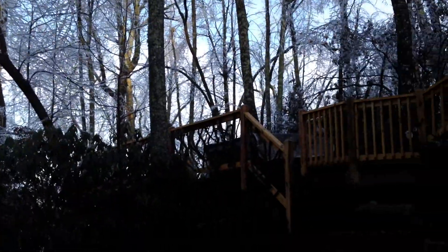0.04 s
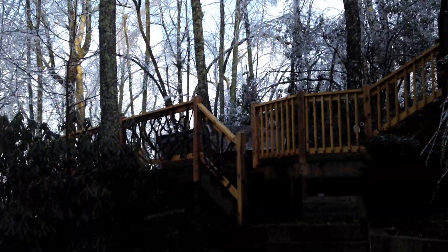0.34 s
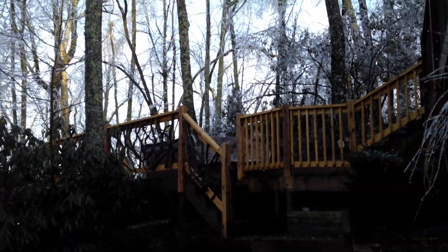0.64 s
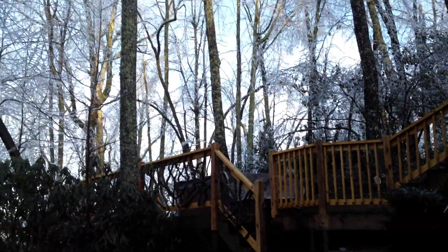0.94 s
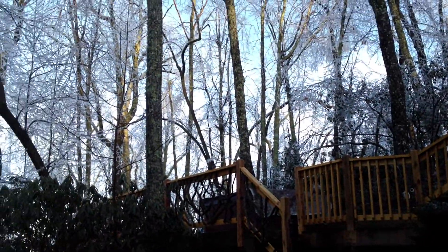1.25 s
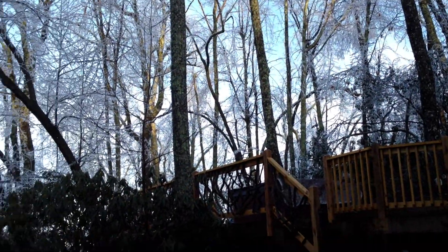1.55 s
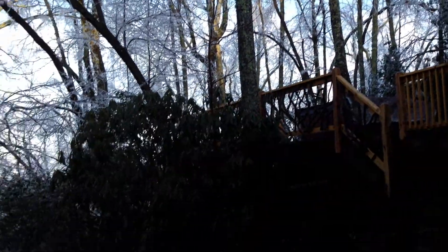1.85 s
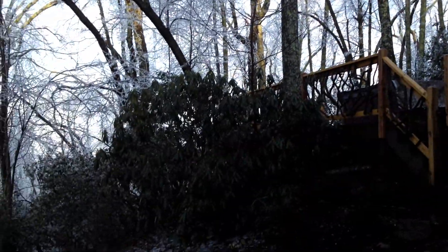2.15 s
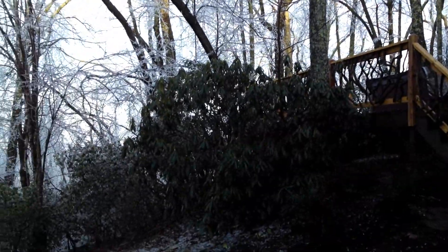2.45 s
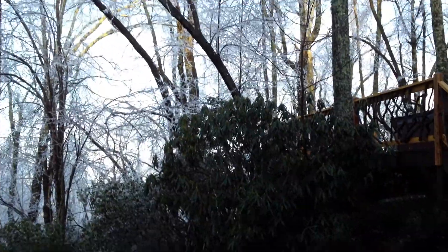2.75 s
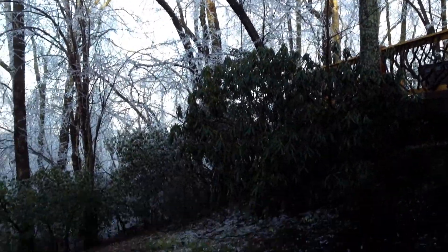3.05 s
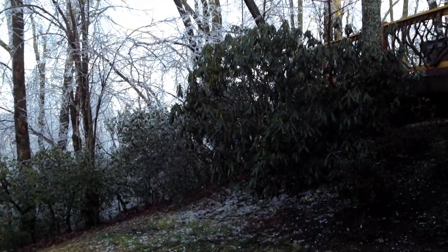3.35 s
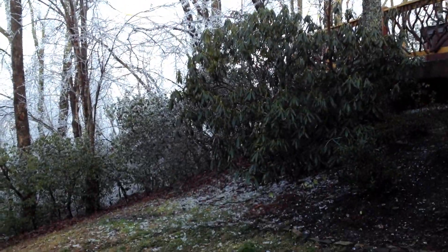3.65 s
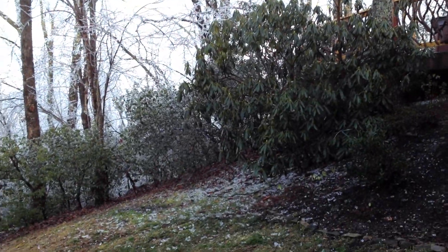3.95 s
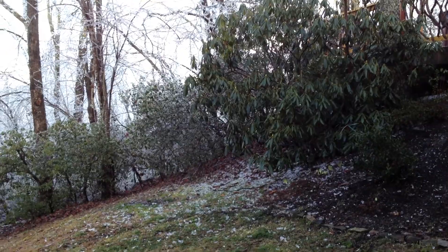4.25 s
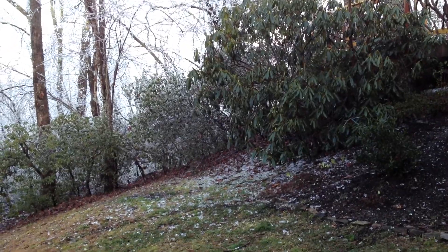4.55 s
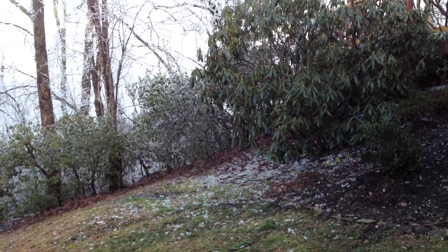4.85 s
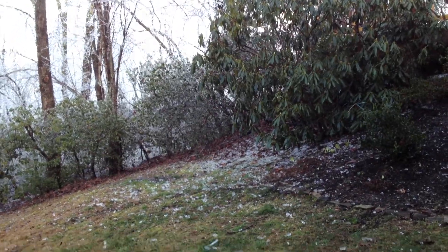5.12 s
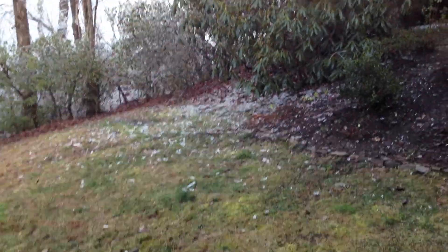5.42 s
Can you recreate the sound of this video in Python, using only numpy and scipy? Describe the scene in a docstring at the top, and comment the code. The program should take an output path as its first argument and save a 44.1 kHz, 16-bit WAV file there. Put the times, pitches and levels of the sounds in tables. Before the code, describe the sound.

A fine, rain-like hiss runs throughout as thawing ice and drips fall from trees onto leaves and ground in a wooded garden. Nearer clumps keep slapping down and scattering into fragments, while splinters snap with crisp clicks and hard pellets plink and clack on icy leaves.

A few plinks and a sharp tick open the sound. The hiss dips briefly near 0.4 seconds, then a lump lands on wood with a soft, hollow, crunchy knock at about 0.6 seconds. The sharpest click comes at 1.3 seconds, and the fall stays busy until nearly 3 seconds, with a cluster of ticks and faint dull branch taps around 1.8 seconds. More scattered ticks and clacks follow between 3.2 and 4.1 seconds as the patter gradually softens. A tick at 4.5 seconds and a clear little plink near 5 seconds stand out. Close hits carry a short echo from the trunks.

```python
"""A fine, hissing patter: ice thaws off the trees of a wooded garden, countless bits and drips landing
on leaves and ground. Nearer clumps slap down and scatter in bursts of fragments. Splinters snap with a
click and a spray of chips; hard pellets plink, clack on iced leaves or tap on branches, and one lump
knocks on wood, each ringing in a few damped modes. Trunks scatter a short echo. The sound is mono."""
import sys
import numpy as np
from scipy import signal
from scipy.fft import rfft, irfft, next_fast_len
from scipy.io import wavfile
from scipy.ndimage import uniform_filter1d, map_coordinates

SR = 44100
rng = np.random.default_rng(int(sys.argv[2]) if len(sys.argv) > 2 else 0)


def to_wav(sig):
    """Store sig (one row per channel, or 1-D mono) as 16-bit WAV at the path in sys.argv[1].

    Samples outside -1..1 are clipped; the rate is SR.
    """
    pcm = np.clip(np.atleast_2d(sig), -1, 1) * 32767
    pcm = np.round(pcm).astype(np.int16)
    wavfile.write(sys.argv[1], SR, pcm.T)  # frames by channels


N = 246078
TOP_HZ = 15500  # upper edge of the whole sound
CLICK_CYCLES = 1.15  # a splinter's click falls to 1/e in this many cycles

# How hard the ice is falling. Each row: time in seconds, strength in dB.
FALL_STRENGTH = [(0.0, -44), (0.39, -51), (0.53, -46), (1.93, -45), (3.54, -46.5), (4.38, -49.5),
                 (4.99, -52), (5.58, -51.5)]
def strength(s):
    """The swell and ebb of the fall, in dB at times s."""
    return np.interp(s, *np.transpose(FALL_STRENGTH))


# Ground, leaf and splinter bands; a heavier fall is brighter.
# Each row: base level in dB at the mean strength, dB gained per dB of strength.
BAND_RESPONSE = [(-57.5, 0.29), (-52.5, 0.56), (-48.5, 1.34)]
def shower():
    """The steady fall all through the wood: far hiss, with nearer grains blurred by their echo."""
    fall_db = strength(np.arange(N) / SR)
    band_db = np.array([db + growth * (fall_db - fall_db.mean()) for db, growth in BAND_RESPONSE])
    far = surfaces(hiss(patchy_db=1.67))
    grains = patter(count=4500, spread_db=4, cycles=3)
    near = surfaces(grains + amp(1) * trunks(grains))
    flurry_db = .3 * wobble(rate=30)
    bands = amp(-2) * far + amp([[-10], [-5.5], [-6.5]]) * near
    return np.sum(amp(band_db + flurry_db) * bands, axis=0)


def patter(count, spread_db, cycles):
    """Tiny impacts at random times, each a few cycles at its own pitch; on average a flat spectrum."""
    when, pitch, weight = rng.random((count, 3)).T[:, :, None]
    hz = 300 + 15000 * pitch ** 2
    n = np.arange(256)
    size = amp(spread_db * np.minimum(-np.log(1 - weight), 3.5)) * np.sqrt(hz * pitch)
    decay = np.exp(-hz * n / SR / cycles) * (1 - n / len(n))
    grains = size * np.sin(2 * np.pi * hz * n / SR) * decay
    positions = (when * N).astype(int) + n
    return unit(np.bincount(positions.ravel(), grains.ravel(), N)[:N])


def hiss(patchy_db):
    """Impacts too far to tell apart: noise with drifting patches of loudness."""
    spectrum = signal.stft(rng.standard_normal(N), nperseg=512)[2]
    patches = uniform_filter1d(rng.standard_normal(spectrum.shape), size=14, axis=0)  # across pitch
    patches = uniform_filter1d(patches, size=7, axis=1)  # across time
    return unit(signal.istft(spectrum * amp(patchy_db * unit(patches)), nperseg=512)[1][:N])


# The overall tone of the patter as heard, with a dip near 4.5 kHz. Each row: frequency in Hz, gain in dB.
PATTER_EQ = [(40, -13), (120, -10), (175, -3), (300, -2.5), (520, -3.5), (760, -2), (1150, -6),
             (1800, -2.5), (3400, -1), (4500, -9.5), (6000, -2.5), (8200, 0), (10000, -2.5), (15000, -3)]
def surfaces(x, leaf_hz=1200, splinter_hz=4500):
    """Give x the patter's tone and split it into ground, leaf and splinter bands, each of rms 1."""
    def above(hz, edge):
        return 1 - 1 / (1 + (hz / edge) ** 8)

    def band(share):
        return unit(filtered(x, lambda hz: amp(along(PATTER_EQ, hz)) * np.sqrt(np.abs(share(hz)))))

    ground = band(lambda hz: 1 - above(hz, leaf_hz))
    leaves = band(lambda hz: above(hz, leaf_hz) - above(hz, splinter_hz))
    splinters = band(lambda hz: above(hz, splinter_hz))
    return np.array([ground, leaves, splinters])


# Larger clumps landing; slush is dull, brittle ice bright.
# Each row: start in seconds, leaf slap level in dB, brightness in dB, t60 in seconds.
BIG_CLUMPS = [(0.06, -46, -14, 0.11), (.105, -53, -17, 0.41), (.211, -46.5, -0.5, 0.39),
              (.34, -49.5, 6, 0.49), (.452, -50.5, 5, 0.36), (.602, -48, 3, 0.33), (0.666, -42.5, 1, 0.11),
              (0.83, -51, 1, 0.49), (.962, -45.5, -7, 0.12), (1.071, -45.5, 2, 0.21),
              (1.118, -47.5, -12, 0.69), (1.322, -40, 2, 0.21), (1.369, -40.5, -2, 0.24),
              (1.468, -47.5, -9, 0.73), (1.516, -44.5, 2, 0.098), (1.607, -46, 0, 0.75),
              (1.76, -44.5, -10.5, 0.43), (1.815, -44, -11.5, 0.4), (1.848, -47, 2, 0.18),
              (1.946, -45, -7, 0.21), (1.995, -48.5, 2, 0.98), (2.105, -45.5, -3, 0.38),
              (2.217, -46, 4, 0.35), (2.292, -44, 0, 0.51), (2.439, -44.5, 3, 0.14),
              (2.563, -50.5, 3, 0.57), (2.638, -46, 1.5, 0.61), (2.73, -52.5, 8, .3),
              (2.845, -51.5, 5.5, 0.66), (3.147, -52, -17, 0.19), (3.234, -48, -4, 0.49),
              (3.315, -46, 0, 0.1), (3.62, -50, -1, 0.73), (3.812, -55, 7, .1), (3.868, -48, 4.5, 0.14),
              (4.101, -46.5, -6, 0.13), (4.22, -61, 12.5, 0.46), (4.514, -52, 7, 0.32),
              (4.98, -52, -1, 0.3), (5.279, -50.5, 0.5, 0.19)]
def clumps():
    """Each clump bursts into fragments that thin out fast; brittle ones splinter more and thud less."""
    t = np.arange(SR // 2) / SR
    power = np.zeros((3, N))
    for s, slap_db, bright_db, t60 in BIG_CLUMPS + small_clumps(count=30):
        thud_db = slap_db - 11.5 - 0.74 * bright_db
        # a loose clump that scatters for long also takes longer to land
        burst = amp(-60 * t / t60) * (1 - np.exp(-t / (0.0056 * t60)))
        for band, db in zip(power, (thud_db, slap_db, slap_db + bright_db)):
            add(band, s, (amp(db) * burst) ** 2)
    fragments = surfaces(patter(count=12000, spread_db=.5, cycles=3.5))
    rustle = surfaces(hiss(patchy_db=1.0))
    texture = amp([[-7], [-3], [-3]]) * fragments + amp([[-1], [-4], [-4]]) * rustle
    spill = np.sum(np.sqrt(power) * texture, axis=0)
    # light pieces stir little bass, and wet leaves soften the highest treble
    return filtered(spill, lambda hz: hz / np.hypot(hz, 190) / np.hypot(1, (hz / 15000) ** 2))


def small_clumps(count, usual_t60=0.17):
    """Rows of lighter clumps, strewn loosely through time, their level riding the fall's strength."""
    place, size, tint, length = rng.standard_normal((count, 4)).T
    s = (np.arange(count) + place % 1) / count * N / SR
    slap_db = strength(s) - 9.5 + 0.5 * size
    bright_db = 5 * np.maximum(tint, -.5)
    return list(zip(s, slap_db, bright_db, usual_t60 * np.exp(length / 2)))


# Single splinters up close. Each row: start in seconds, click level in dB, pitch in Hz,
# spray level in dB, spray t60 in seconds.
SPLINTER_TICKS = [(.1422, -21.5, 6500, -35, .022), (0.2139, -35, 5000, -40.5, .09),
                  (0.2361, -32, 5000, -37, .03), (.5565, -28, 6800, -39, .015),
                  (.673, -33, 6000, -39.5, 0.091), (0.8313, -29, 4660, -36, 0.038),
                  (1.0715, -28, 8700, -42, .03), (1.2337, -23, 7740, -42, .015),
                  (1.322, -12.5, 8600, -33.5, 0.048), (1.333, -27, 6500, -43, .03),
                  (1.3793, -22, 11500, -37, .035), (1.8132, -21, 7350, -31.5, 0.012),
                  (1.851, -24, 7950, -37.5, .05), (1.855, -27, 8500, -47, .02),
                  (1.9464, -25, 4000, -40, 0.043), (1.996, -28, 6000, -40, .025),
                  (2.04, -28, 6800, -42, .02), (2.219, -30, 11700, -43, .05),
                  (2.329, -27, 7650, -37, 0.036), (2.44, -35, 5000, -43, .04),
                  (2.564, -37, 5200, -44, .016), (2.669, -34, 6900, -42, .03), (2.737, -34, 8000, -46, .03),
                  (3.2335, -32, 11000, -38.5, .02), (3.328, -30, 7500, -39, .03),
                  (3.458, -30, 10500, -41, .05), (4.5131, -30, 8140, -39.5, 0.029),
                  (4.964, -36, 7600, -43, .018)]
def ticks(spray_db_per_octave=11.5):
    """A splinter snaps: one sharp click, then a spray of chips through the leaves around its pitch."""
    out, t = np.zeros(N), np.arange(SR // 8) / SR
    freqs = np.fft.rfftfreq(len(t), 1 / SR)
    for s, click_db, hz, spray_db, t60 in SPLINTER_TICKS:
        click = np.sin(2 * np.pi * hz * t) * np.exp(-hz * t / CLICK_CYCLES)
        octaves_away = np.abs(np.log2((freqs + 1) / hz))
        colour = amp(along(PATTER_EQ, freqs) / 2 - spray_db_per_octave * octaves_away)
        noise = rng.standard_normal(len(t))
        spray = unit(irfft(rfft(noise) * colour * (freqs < TOP_HZ), len(t)))
        add(out, s, amp(click_db) * click + amp(spray_db) * spray * amp(-60 * t / t60))
    return out


# Hard pellets that ring. Each row: start in seconds, relative level in dB, pitch in Hz, t60 in seconds.
PELLET_PLINKS = [(.044, -21, 2560, .018), (0.073, -23, 2470, .015), (.105, -27, 11000, .04),
                 (0.142, -26, 3290, 0.032), (.965, -31.5, 1400, .05), (1.386, -22, 3100, .022),
                 (1.8318, -22, 3040, 0.025), (2.329, -26, 2490, .025), (2.641, -28, 2420, .025),
                 (3.3543, -26, 3640, .022), (3.6665, -26, 2090, .016), (3.809, -29, 2920, .02),
                 (3.877, -34, 2800, .025), (4.108, -39, 3140, .02), (4.9646, -19, 2670, 0.035)]
def plinks():
    """A pellet chips on contact and rings in two close, opposed modes, with a weak, short upper one."""
    out, t = np.zeros(N), np.arange(SR // 5) / SR
    for s, db, hz, t60 in PELLET_PLINKS + faint_pellets(count=18):
        pair = np.sin(2 * np.pi * hz * t) - .45 * np.sin(2 * np.pi * hz * 1.06 * t)
        upper_hz = hz * 2.46
        upper = amp(-10 - 60 * t / 0.043) * (upper_hz < TOP_HZ) * np.sin(2 * np.pi * upper_hz * t)
        envelope = amp(-60 * t / t60) * (1 - np.exp(-t / 0.00061))
        chip = amp(-16 - 60 * t / 0.008) * rng.standard_normal(len(t))
        add(out, s, amp(db - 11) * ((pair + upper) * envelope + chip))
    return out


def faint_pellets(count, usual_hz=2515, scatter_octaves=0.296, usual_t60=0.032):
    """Rows of farther pellets, strewn loosely through time, their level riding the fall's strength."""
    place, pitch, length = rng.standard_normal((count, 3)).T
    s = (np.arange(count) + place % 1) / count * N / SR
    hz = usual_hz * 2 ** (scatter_octaves * pitch)
    return list(zip(s, strength(s) + 10.5, hz, usual_t60 * np.exp(length / 2)))


# Hard bits on iced leaves. Each row: start in seconds, level in dB, centre pitch in Hz, t60 in seconds,
# scatter of the modes in octaves. A narrow scatter turns the clack into a clink.
LEAF_CLACKS = [(.073, -43, 2980, .04, 0.065), (1.3223, -39.5, 3000, 0.051, .5),
               (1.5184, -40.5, 2160, 0.08, 0.32), (1.767, -39.5, 1770, 0.067, .45),
               (1.9462, -40, 2210, 0.033, 0.53), (1.964, -41, 1670, 0.07, .2),
               (2.328, -44, 2430, .04, 0.15), (2.5642, -37.5, 3420, 0.018, 0.2),
               (2.6405, -41, 2910, 0.037, .35), (2.658, -44, 2600, .04, 0.17),
               (2.671, -42, 2790, 0.04, 0.26), (2.872, -42.5, 1590, 0.03, .25),
               (3.644, -44, 2960, 0.045, 0.14), (3.8086, -44, 2750, .022, .25),
               (3.872, -43.5, 2700, 0.042, .45), (4.1073, -45, 1890, .022, 0.46),
               (4.9652, -42, 2290, 0.027, .8), (4.972, -44, 2920, 0.075, 0.048)]
def clacks():
    """A hard bit hits a stiff, iced leaf: a cluster of quickly damped modes, different for every leaf."""
    out, t = np.zeros(N), np.arange(SR // 10) / SR
    for s, db, hz, t60, scatter in LEAF_CLACKS:
        jitter, phase = rng.random((2, 24, 1))
        offset = (np.arange(24)[:, None] + jitter) / 6 - 2  # 24 modes from -2 to 2, loudest at 0
        mode_hz = hz * 2 ** (scatter * offset)
        modes = np.exp(-offset ** 2 / 2) * np.sin(2 * np.pi * (mode_hz * t + phase))
        add(out, s, amp(db) * unit(modes.sum(axis=0)) * amp(-60 * t / t60))
    return out


# Dull, hollow taps on branches. Each row: start in seconds, relative level in dB, pitch in Hz.
BRANCH_TAPS = [(.103, -37.5, 500), (.967, -39.5, 804), (1.389, -39.5, 617), (1.632, -39, 690),
               (1.768, -36, 298), (1.852, -37.5, 348), (2.107, -40.5, 256), (3.63, -43, 450),
               (3.667, -43, 382)]
def taps(lowest_mode_t60=0.062):
    """A struck branch sounds a few damped bending modes, the higher ones dying sooner."""
    out, t = np.zeros(N), np.arange(SR // 4) / SR
    ratios = np.array([[1], [2.3], [4.1]])
    decays = amp(-60 * t * np.sqrt(ratios) / lowest_mode_t60)
    attack = 1 - np.exp(-t / 0.00066)
    for s, db, hz in BRANCH_TAPS:
        modes = np.sin(2 * np.pi * hz * ratios * t) * decays / ratios ** 0.54
        add(out, s, amp(db - 6) * modes.sum(axis=0) * attack)
    return out


# The wood's hollow voice. Each row: mode frequency in Hz, relative level in dB, t60 in seconds.
WOOD_MODES = [(314, -13.5, .18), (375, -10.5, .18), (630, 1, .06), (708, -3, .055), (860, -8, .04),
              (1015, -2, .055), (1150, -3, .04), (1680, -3, .035), (1785, 0, .045), (2044, -5, .035)]
# A lump landing on wood. Each row: start in seconds, ring level in dB, crunch level in dB.
LUMP_KNOCKS = [(.629, -35.5, -38.5)]
def knock():
    """A heavier lump crunches on wood, which answers with a hollow ring."""
    out, t = np.zeros(N), np.arange(SR // 4) / SR
    # neighbouring modes swing in opposite directions, so no bass is radiated
    ring = sum((-1) ** k * amp(db - 60 * t / t60) * np.sin(2 * np.pi * hz * t)
               for k, (hz, db, t60) in enumerate(WOOD_MODES))
    crunch_band = signal.butter(3, [500, 2400], "band", fs=SR)
    for s, ring_db, crunch_db in LUMP_KNOCKS:
        crunch = unit(signal.lfilter(*crunch_band, rng.standard_normal(len(t))))
        add(out, s, amp(ring_db) * ring + amp(crunch_db) * crunch * amp(-60 * t / 0.084))
    return out


def crackle(count, range_db=10, fade_db_per_s=.6):
    """Tiny splinters all around, each a click and a puff of chips, riding the fall and slowly ebbing."""
    out, t = np.zeros(N), np.arange(512) / SR
    for when, faintness, pitch in rng.random((count, 3)):
        s, hz = when * N / SR, 5500 + 7000 * pitch ** 2
        click = np.sin(2 * np.pi * hz * t) * np.exp(-hz * t / CLICK_CYCLES)
        noise = rng.standard_normal(len(t))
        chips = signal.lfilter(*signal.iirpeak(hz, Q=1.2, fs=SR), noise) * amp(-60 * t / .016)
        db = strength(s) + 17 - range_db * np.sqrt(faintness) - fade_db_per_s * s
        add(out, s, amp(db) * (click + chips / 2))
    return out


# The echo among the trunks. Each row: frequency in Hz, t60 in seconds.
TRUNK_DECAY = [(200, 0.25), (3000, 0.27), (12000, 0.28)]
def trunks(x):
    """Trunks scatter a short, diffuse echo that dies at nearly the same rate at every pitch."""
    hz, t, spectrum = signal.stft(rng.standard_normal(SR // 2), SR, nperseg=256)
    decay = amp(-60 * t / along(TRUNK_DECAY, hz)[:, None])
    tail = signal.istft(spectrum * decay, SR, nperseg=256)[1]
    predelayed = np.pad(x, (200, 0))
    return signal.fftconvolve(predelayed, tail / np.linalg.norm(tail))[:N]


def amp(db):
    """Decibels to gain."""
    return 10 ** (np.asarray(db) / 20)


def unit(x):
    """Scale to rms 1."""
    return x / np.sqrt(np.mean(x ** 2) + 1e-20)


def along(points, hz):
    """Read a curve of (Hz, value) points at hz, on a log frequency axis."""
    freqs, values = np.transpose(points)
    return np.interp(np.log(hz + 1), np.log(freqs + 1), values)


def wobble(rate):
    """A smooth random curve, rate knots a second."""
    return map_coordinates(rng.standard_normal(int(N * rate / SR) + 4), [np.arange(N) * rate / SR])


def filtered(x, response):
    """Equalise x with a gain given as a function of Hz."""
    size = next_fast_len(N + 8192)
    return irfft(rfft(x, size) * response(np.fft.rfftfreq(size, 1 / SR)), size)[:N]


def add(track, s, sound):
    """Mix a sound into the track at s seconds."""
    part = track[max(round(s * SR), 0):][:len(sound)]
    part += sound[:len(part)]


def scene():
    """The falling ice, with close hits and their echo on top, alike in both channels."""
    close = ticks() + clacks() + plinks() + taps() + knock() + crackle(count=80)
    mono = shower() + clumps() + close + amp(-7) * trunks(close)
    return np.array([mono, mono])


def record(dry):
    """A small microphone sheds the bass, and everything above TOP_HZ is cut."""
    thin = signal.sosfilt(signal.butter(3, 125, "high", fs=SR, output="sos"), dry)
    return np.array([filtered(channel, lambda hz: hz < TOP_HZ) for channel in thin])


dry = scene()
out = record(dry)
to_wav(out)
```